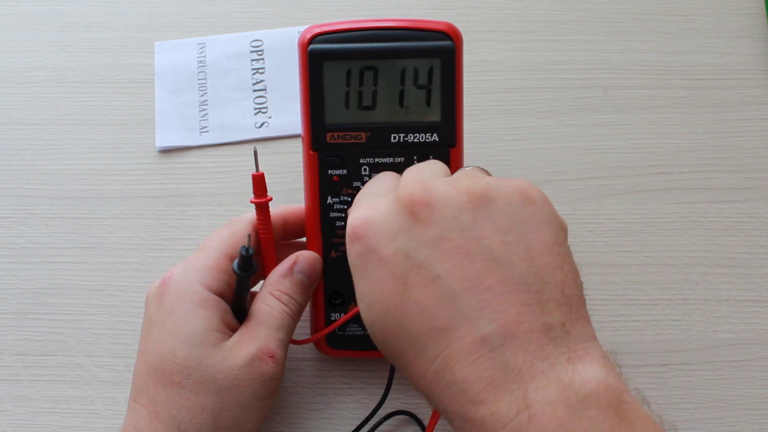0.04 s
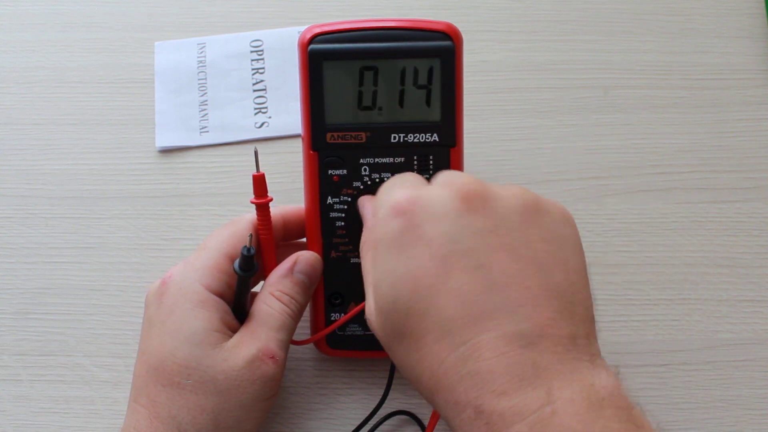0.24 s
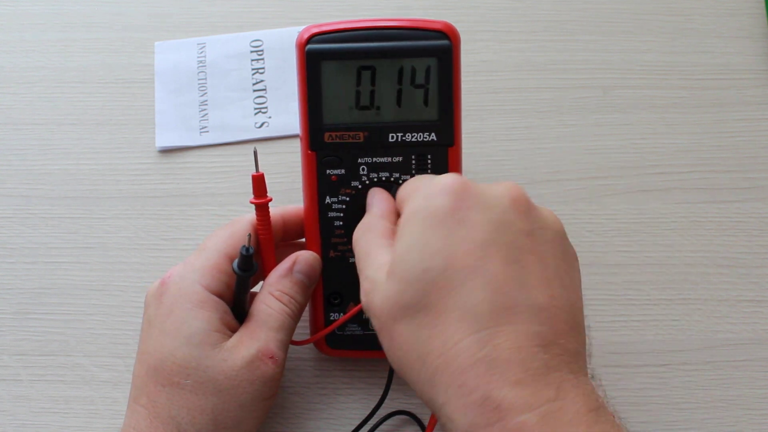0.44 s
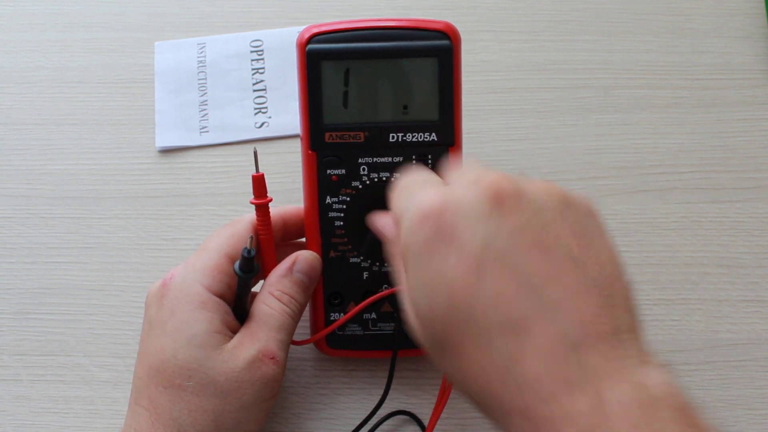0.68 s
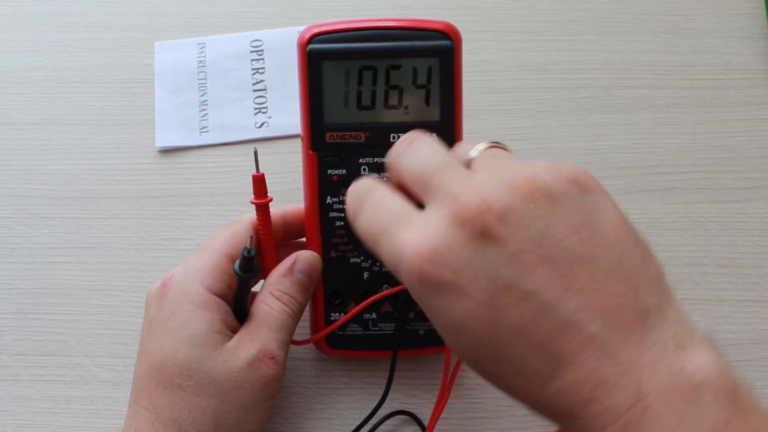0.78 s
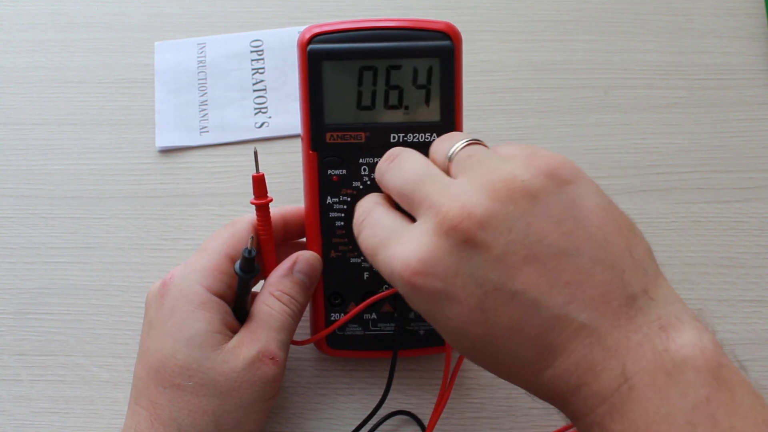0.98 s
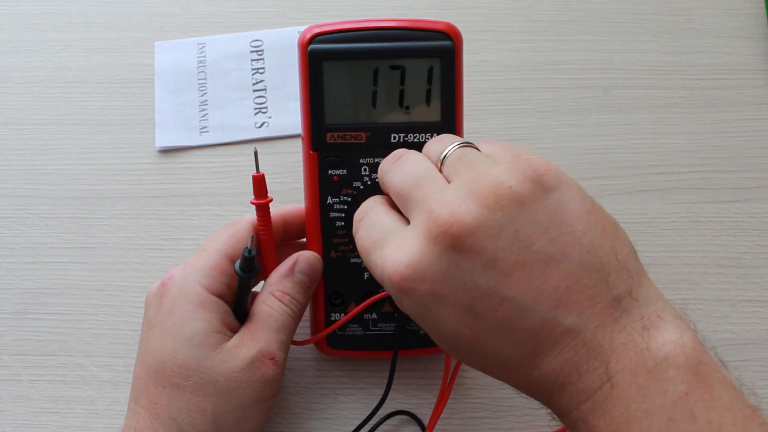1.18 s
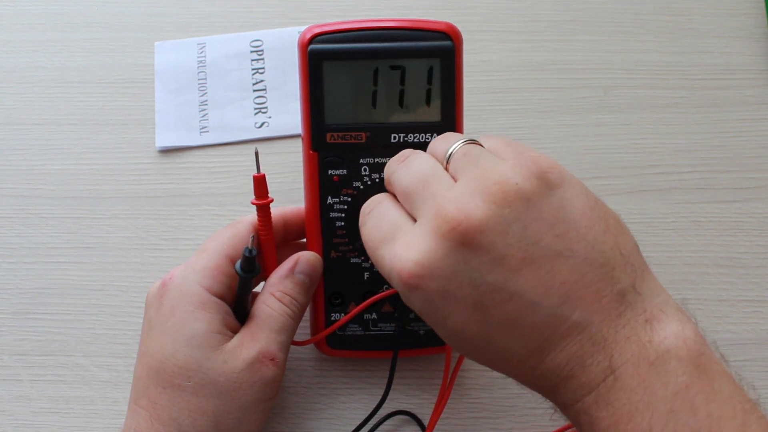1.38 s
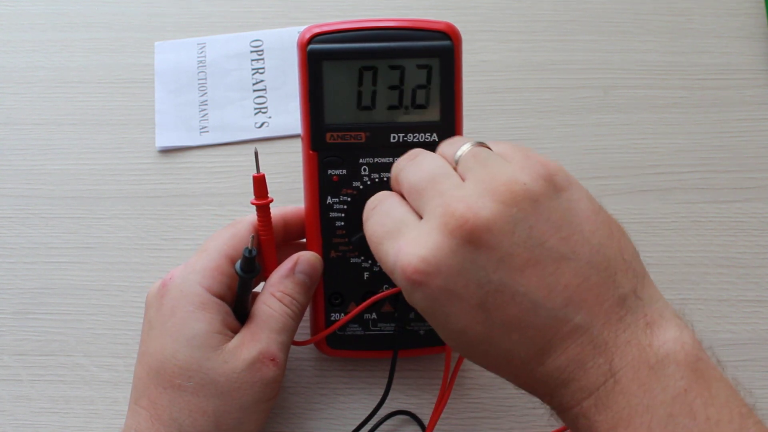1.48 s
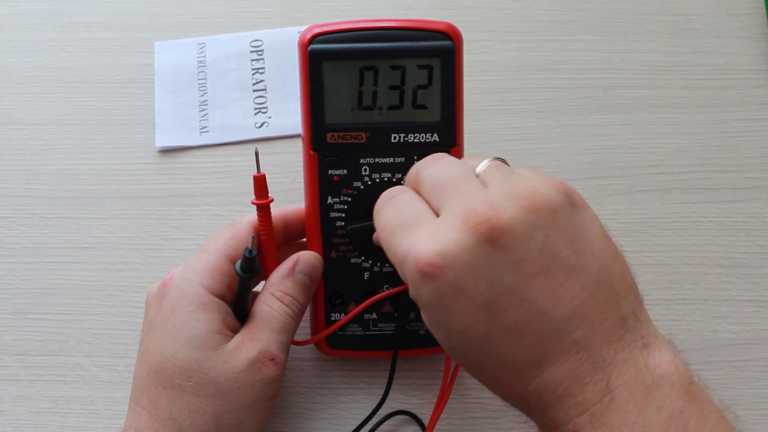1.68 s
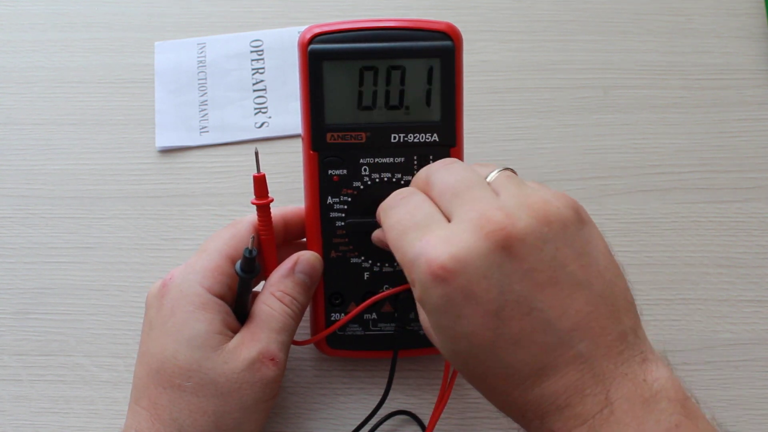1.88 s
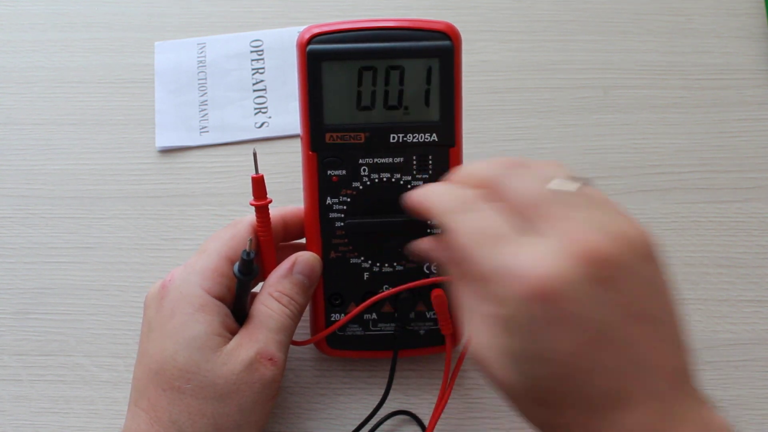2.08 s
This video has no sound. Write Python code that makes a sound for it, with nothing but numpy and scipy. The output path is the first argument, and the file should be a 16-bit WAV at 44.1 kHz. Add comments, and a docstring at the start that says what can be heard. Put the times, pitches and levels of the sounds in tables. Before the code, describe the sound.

Sharp, bright plastic clicks of a rotary selector: seven from 0.07 to 0.56 seconds, roughly every 0.08, with dull case knocks just before and a faint short squeak near 0.48. Soft rubs and taps around 0.7 during a regrip. A very hard snap at 1.35, then hollower clicks at 1.5, 1.56, weaker at 1.69 and 1.89; soft knocks at 2.1. Close, small live room, faint hiss.

```python
"""Two runs of sharp plastic clicks, with soft knocks, small rubs and one short squeak, in a small live room.
A handheld meter's rotary selector is turned: at each detent the spring ticks, then snaps and rings the case.
Clicks are noise cracks plus damped modes; knocks are low pulses with a thud and a scuff on the table.
Rubs are grainy noise and the squeak is a sagging sine. Echoes, a noise tail and standing waves make the room.
Filtered noise gives the quiet air and hiss; peaks over full scale are clipped."""
import sys
import numpy as np
from scipy import signal
from scipy.fft import rfft, irfft, next_fast_len
from scipy.io import wavfile

SR = 44100
rng = np.random.default_rng(int(sys.argv[2]) if len(sys.argv) > 2 else 0)


def unload_wav(signal):
    """Save mono or channel-first audio to the path in sys.argv[1] as 16-bit WAV at rate SR, clipped to [-1, 1]."""
    wavfile.write(
        sys.argv[1],
        SR,
        np.round(np.clip(np.atleast_2d(signal).T, -1, 1) * 32767).astype(np.int16),
    )


N = 94241  # length in samples

# Clicks of the selector. Each row: snap time in seconds, snap level in dB, tick lead before the snap in seconds,
# tick level in dB, tilt in dB per octave, favoured resonance in Hz, top treble in dB, case thud in dB,
# room boom in dB.
DETENT_CLICKS = [(0.0722, -6, .0015, -20, 0.7, 7600, -3, -22.5, -57.5),
                 (.1523, -13.5, 0.0032, -25, 1.7, 5800, -3.5, -29, -55.5),
                 (.2292, -9.5, .0022, -22.5, 0.3, 7200, -3, -26, -55.5),
                 (0.303, -13, 0.002, -23, -.7, 2290, -2.5, -28, -70),
                 (.3963, -9.5, .002, -24.5, 0.3, 2390, -5.5, -28, -59),
                 (0.4553, -14, .0025, -18, 1, 5800, -0.5, -33, -58.5),
                 (0.5554, -12, .0026, -22.5, -0.5, 6000, -4, -34.5, -58.5),
                 (1.3546, -5, .0012, -16.5, 0.63, 3290, -1, -34, -52.5),
                 (1.4969, -10.5, 0.0025, -20.5, -2.5, 4430, 6, -26.5, -49.5),
                 (1.5644, -11.5, .0019, -24.5, 0, 4750, 0.5, -26, -48.5),
                 (1.6857, -21.5, 0.0039, -27.5, 0, 1970, -3, -25, -51.5),
                 (1.8875, -28, 0.0047, -23, -0.4, 1970, 2.5, -25, -50.5)]
# The case rocking on the table. Each row: start in seconds, level in dB, pitch in Hz.
CASE_KNOCKS = [(.0175, -30, 467), (0.0285, -21, 473), (.0465, -20, 468), (.059, -24.5, 420),
               (.473, -34, 595), (.697, -43.5, 440), (.756, -44.5, 565), (.759, -38, 1210),
               (1.889, -29.5, 545), (1.893, -34.5, 330), (2.1055, -36.5, 490), (2.1153, -28.5, 460),
               (2.126, -29.5, 513)]
# Fingers brushing the knob. Each row: start in seconds, length in seconds, level in dB, tilt in dB per octave.
FINGER_BRUSHES = [(0.065, 0.011, -33, -11), (0.717, 0.03, -41.5, -5.5), (0.749, 0.017, -44, -7.5),
                  (1.3485, .005, -26.5, -6.5), (1.67, 0.0099, -37.5, -11.5), (1.871, 0.0147, -40.5, -11.5)]
# Resonances of plastic case and spring. Each row: nominal frequency in Hz, nominal level in dB, t60 in seconds.
CASE_MODES = [(1670, -13, .012), (2506, -0.5, 0.02), (2930, -1, 0.0092), (3630, -4, 0.019),
              (4730, -5.5, 0.02), (5160, -7, .012), (5800, 0, 0.03), (5740, -1, 0.0088),
              (6970, -3.5, 0.0098), (8100, 2, 0.013), (8840, 3.5, 0.017), (9810, 0, 0.023),
              (11160, -23.5, 0.0089)]
# Resonances of the case as a whole. Each row: nominal frequency in Hz, nominal level in dB, t60 in seconds.
BODY_MODES = [(290, -9, 0.029), (420, -9.5, 0.039), (531, -5, 0.028), (600, 0, .03), (867, -4, 0.021),
              (1225, -5.5, .016), (1645, -4, .015)]
# Colour of the contact crack, also under the finger rubs. Each row: frequency in Hz, level in dB.
CRACK_COLOUR = [(100, -9.5), (500, -16), (950, -8.5), (1450, -11), (2300, -2), (5800, 1), (9000, -2.5),
                (12000, -6.5), (15500, -31)]
# A click summed over all directions, as the room receives it. Each row: frequency in Hz, level in dB.
SPREAD_COLOUR = [(100, -31.5), (500, -12), (1000, -12.5), (1450, -11), (2400, -2), (4000, 0.5), (5700, 0.5),
                 (7200, -1.5), (8400, -0.5), (10000, -2), (12000, -12), (15500, -33.5)]
# Colour of the case scuffing the table. Each row: frequency in Hz, level in dB.
SCUFF_COLOUR = [(80, -27), (300, 1), (650, -5.5), (1300, -16.5), (3000, -18.5), (9000, -27.5),
                (15000, -48.5)]
# Decay of the room tail. Each row: frequency in Hz, t60 in seconds.
ROOM_DECAY = [(150, 0.87), (500, 0.12), (1400, 0.5653), (3700, 0.4558), (7000, .5), (10000, 0.405),
              (15000, 0.43)]
# Colour of the room tail. Each row: frequency in Hz, level in dB.
TAIL_COLOUR = [(100, -12.5), (400, 2.5), (1200, 2.5), (3000, -3), (5500, -2.5), (9000, -3), (14000, -3)]
# Standing waves of the room. Each row: nominal frequency in Hz, nominal level in dB, t60 in seconds.
STANDING_WAVES = [(134.4, -2, 0.97), (174.9, -3.5, 0.41), (214, -5.5, 0.52)]
# Early echoes off the walls. Each row: nominal delay in seconds, level in dB.
WALL_ECHOES = [(.0058, -19), (.0092, -16.5), (0.0136, -20), (0.0226, -25)]
# Spectrum of the steady background. Each row: frequency in Hz, relative level in dB per Hz.
BACKGROUND_COLOUR = [(25, -5), (90, -15), (140, -6), (250, -3.5), (420, 1), (1000, -3), (3000, -8.5),
                     (8000, -16.5), (15000, -32.5)]

BACKGROUND_DB = -54
ROOM_TAIL_DB, ROOM_ONSET_S = -4, 0.0028
SOFT_ROOM_DB = -4  # tail send of the knocks and the squeak

CRACK_DB, CRACK_T60_S = 4.5, 0.0043
SNAP_HOLD_S, TICK_HOLD_S = 0.0012, 0.0005  # the crack stays level this long before it decays
CHATTER_DB, CHATTER_T60_S = -14, 0.037  # loose parts shiver on after the crack
BOUNCE_S = 0.00048  # nominal gap between strikes of the spring, all equally strong
TICK_TILT_DB = -2.84  # the tick is duller than its snap, in dB per octave
EVEN_DB, BEAMED_DB = -1, -4.5  # shares of the even and the mode-coloured click sent to the room tail
BASS_CUT_HZ = 390

FAVOUR_DB, FAVOUR_OCTAVES = 4, 0.12  # each notch favours one resonance of the case
REGRIP_S = 1.0  # after the change of grip the clicks sound hollower
HOLLOW_HZ, HOLLOW_DB, HOLLOW_OCTAVES = 6700, -3.5, 0.13

THUD_RISE_S, BOOM_RISE_S = 0.0017, 0.012  # time constants
BUMP_S, BUMP_DB, BUMP_PEAK_S = 1.3547, -24.5, 0.00062  # start, level, time from start to peak
KNOCK_RISE_S = 0.0014  # the push envelope peaks after twice this time
KNOCK_RATTLE_DB = -6.5
SCUFF_DB, SCUFF_T60_S = -11.5, 0.028
SQUEAK_S, SQUEAK_LENGTH_S, SQUEAK_DB = 0.478, 0.05, -41
SQUEAK_HZ, SQUEAK_SAG_HZ_PER_S = 447, 1160  # starting pitch and its fall

CLIP_TOP, TOP_HZ = 1, 15900  # full scale; nominal upper band limit


def amp(db):
    """Decibels to gain."""
    return 10 ** (np.asarray(db) / 20)


def unit(x):
    """Scale to rms 1."""
    return x / np.sqrt(np.mean(x ** 2) + 1e-20)


def along(points, hz):
    """Read a curve of (Hz, value) points on a log frequency axis."""
    f, v = np.transpose(points)
    return np.interp(np.log(hz + 1), np.log(f + 1), v)


def coloured(x, db_of_hz):
    """Filter with a dB curve at minimum phase, so nothing sounds before its cause."""
    m = 2 * next_fast_len(len(x) // 2 + 4096)
    log_gain = np.log(amp(db_of_hz(np.fft.rfftfreq(m, 1 / SR))))
    cepstrum = irfft(log_gain, m)
    # Fold the cepstrum onto positive time.
    cepstrum[1:m // 2] *= 2
    cepstrum[m // 2 + 1:] = 0
    return irfft(rfft(x, m) * np.exp(rfft(cepstrum)), m)[:len(x)]


def tilt_curve(tilt_db, hz):
    """A dB-per-octave slope around 5 kHz, flat below 1 kHz and above 12 kHz."""
    return tilt_db * np.log2(np.clip(hz, 1000, 12000) / 5000)


def bass_cut(x):
    """The small case radiates no deep bass."""
    highpass = signal.butter(3, BASS_CUT_HZ, 'high', fs=SR, output='sos')
    return signal.sosfilt(highpass, x)


def fade(t, t60):
    """Exponential decay by 60 dB in t60 seconds."""
    return np.exp(-np.log(1000) * t / t60)


def swell(t, length_s):
    """A half-sine envelope, silent after length_s."""
    return np.sin(np.pi * np.minimum(t / length_s, 1))


def add(track, s, x):
    """Mix x into the track at s seconds."""
    i = max(0, round(s * SR))
    track[i:i + len(x)] += x[:max(0, N - i)]


def ring(modes, t, spread_db=1.0, detune=0.016):
    """Damped modes, each with random polarity and slightly random level and pitch."""
    total = np.zeros(len(t))
    for hz, db, t60 in modes:
        gain = rng.choice([-1, 1]) * amp(db + spread_db * rng.normal())
        pitch_hz = hz * (1 + detune * rng.normal())
        total += gain * fade(t, t60) * np.sin(2 * np.pi * pitch_hz * t)
    return total


def in_room(x, send):
    """Direct sound x with early wall echoes, plus the diffuse noise tail excited by send."""
    noise = rng.standard_normal(SR * 3 // 4)
    hz, t, bands = signal.stft(noise, SR, nperseg=256)
    decay = fade(t, along(ROOM_DECAY, hz)[:, None])
    tail = signal.istft(bands * decay, SR, nperseg=256)[1]
    tail *= 1 - np.exp(-(np.arange(len(tail)) / SR / ROOM_ONSET_S) ** 2)
    tail = coloured(tail / np.linalg.norm(tail), lambda f: along(TAIL_COLOUR, f))
    tail *= amp(ROOM_TAIL_DB)
    early = np.zeros(len(tail))
    early[0] = 1  # direct sound
    for delay_s, db in WALL_ECHOES:
        early[round(delay_s * SR * rng.uniform(.96, 1.04))] += amp(db)
    return signal.fftconvolve(x, early) + signal.fftconvolve(send, tail)


def background():
    """Quiet room air and hiss: steady filtered noise."""
    hiss = coloured(rng.standard_normal(N), lambda hz: along(BACKGROUND_COLOUR, hz))
    return amp(BACKGROUND_DB) * unit(hiss)


def squeak():
    """A finger slips on the knob: a short, low stick-slip tone that sags as the finger slows."""
    out, t = np.zeros(N), np.arange(SR // 10) / SR
    pitch_hz = SQUEAK_HZ - SQUEAK_SAG_HZ_PER_S * t
    tone = np.sin(2 * np.pi * np.cumsum(pitch_hz) / SR)
    tone *= amp(SQUEAK_DB) * swell(t, SQUEAK_LENGTH_S)
    add(out, SQUEAK_S, in_room(tone, amp(SOFT_ROOM_DB) * tone))
    return out


def fingers():
    """Short rubs as the hand grips and loads the knob: noise of uneven grain strength."""
    out, t = np.zeros(N), np.arange(SR // 10) / SR
    for s, length_s, db, tilt_db in FINGER_BRUSHES:
        grains = rng.standard_normal(len(t)) * amp(3.5 * rng.standard_normal(len(t)))
        rub = coloured(grains, lambda hz: along(CRACK_COLOUR, hz))
        rub = coloured(rub, lambda hz: tilt_curve(tilt_db, hz))
        rub = unit(bass_cut(rub)) * amp(db) * swell(t, length_s)
        add(out, s, in_room(rub, rub))
    return out


def thud():
    """The whole case shakes: low damped modes with a soft onset, redrawn each time; peak 1."""
    t = np.arange(SR // 10) / SR
    shake = ring(BODY_MODES, t, spread_db=1, detune=0.023)
    shake = bass_cut(shake * (1 - np.exp(-t / THUD_RISE_S)))
    return shake / np.abs(shake).max()


def rocking():
    """Soft, dull knocks of the padded case on the table: a pitched push, a body thud and a scuff."""
    out, t = np.zeros(N), np.arange(SR // 10) / SR
    u = t / KNOCK_RISE_S
    for s, db, hz in CASE_KNOCKS:
        push = (u / 2) ** 2 * np.exp(2 - u) * np.sin(2 * np.pi * hz * t)
        scuff = unit(coloured(rng.standard_normal(len(t)), lambda f: along(SCUFF_COLOUR, f)))
        scuff *= (1 - np.exp(-u)) * fade(t, SCUFF_T60_S)
        knock = amp(db) * (push + amp(KNOCK_RATTLE_DB) * thud() + amp(SCUFF_DB) * scuff)
        add(out, s, in_room(knock, amp(SOFT_ROOM_DB) * knock))
    return out


def room_boom():
    """Each snap sets the room's standing waves humming, with a soft onset."""
    t = np.arange(N) / SR
    return ring(STANDING_WAVES, t, spread_db=2, detune=0.00397) * (1 - np.exp(-t / BOOM_RISE_S))


def bump():
    """A low bump under the hardest snap: one smooth pressure pulse."""
    u = np.arange(N) / SR / BUMP_PEAK_S
    return amp(BUMP_DB) * u * np.exp(1 - u)


def notch_colour(tilt_db, favoured_hz, top_db, regripped):
    """The dB curve that one position of dial and hand gives its click."""
    def curve(hz):
        def bell(centre_hz, octaves):
            return np.exp(-.5 * (np.log2((hz + 1) / centre_hz) / octaves) ** 2)
        top = top_db * np.clip((hz - 8000) / 4000, 0, 1)  # treble shelf
        favour = FAVOUR_DB * bell(favoured_hz, FAVOUR_OCTAVES)
        hollow = regripped * HOLLOW_DB * bell(HOLLOW_HZ, HOLLOW_OCTAVES)
        return tilt_curve(tilt_db, hz) + top + favour + hollow
    return curve


def contact(colour, hold_s, count):
    """One noise crack while the spring strikes the case modes count times; rows: direct, room send."""
    t = np.arange(SR // 10) / SR
    modes, rings = ring(CASE_MODES, t), np.zeros(len(t))
    for k in range(count):
        i = round(abs(k + .2 * rng.normal()) * BOUNCE_S * SR) if k else 0
        rings[i:] += modes[:len(t) - i]
    shape = fade(np.maximum(t - hold_s, 0), CRACK_T60_S)
    shape += amp(CHATTER_DB) * fade(t, CHATTER_T60_S)
    crack = coloured(shape * rng.standard_normal(len(t)), lambda hz: along(CRACK_COLOUR, hz))
    click = unit(rings) + amp(CRACK_DB) * unit(crack)
    click = unit(bass_cut(coloured(click, colour)))
    impulse = 1. * (t == 0)
    even = coloured(impulse, lambda hz: along(SPREAD_COLOUR, hz) + colour(hz))
    even = unit(bass_cut(even))
    send = amp(EVEN_DB) * even + amp(BEAMED_DB) * click
    # The direct click carries the energy of rms 1 over 2 ms.
    return np.array([click, send]) * np.sqrt(.002 / t[-1])


def dial():
    """At each detent the spring ticks over the ridge, then snaps into the notch and shakes the case."""
    out = np.zeros(N)
    for s, snap_db, lead_s, tick_db, tilt_db, favoured_hz, top_db, thud_db, boom_db in DETENT_CLICKS:
        regripped = s > REGRIP_S
        snap_colour = notch_colour(tilt_db, favoured_hz, top_db, regripped)
        tick_colour = notch_colour(tilt_db + TICK_TILT_DB, favoured_hz, top_db, regripped)
        snap = amp(snap_db) * contact(snap_colour, SNAP_HOLD_S, count=3)
        tick = amp(tick_db) * contact(tick_colour, TICK_HOLD_S, count=2)
        add(out, s - lead_s, in_room(*tick))
        add(out, s, in_room(*(snap + amp(thud_db) * thud())))
        add(out, s, amp(boom_db) * room_boom())
    add(out, BUMP_S, bump())
    return out


def scene():
    """Everything summed at one microphone."""
    return (background() + squeak() + fingers() + rocking() + dial())[None]


def record(dry):
    """Overload clips peaks beyond full scale; the treble then fades out around the band limit."""
    m = next_fast_len(N + SR // 2)
    keep = np.clip((TOP_HZ - np.fft.rfftfreq(m, 1 / SR)) / 700 + .3, 0, 1)
    clipped = np.clip(dry, -CLIP_TOP, CLIP_TOP)
    return irfft(rfft(clipped, m) * keep, m)[..., :N]


dry = scene()
out = record(dry)
unload_wav(out)
```